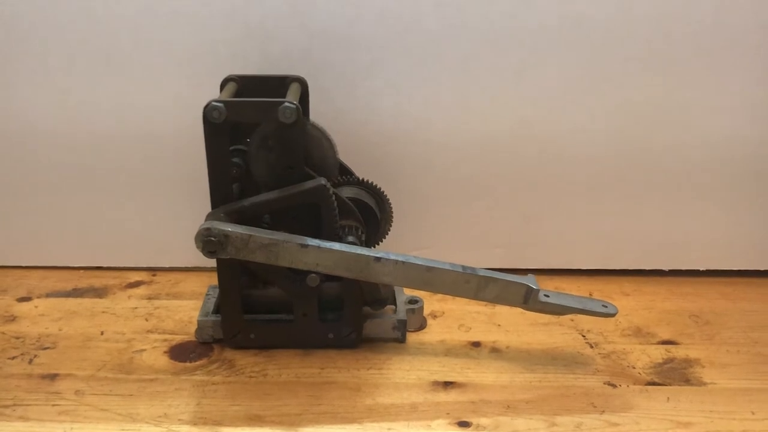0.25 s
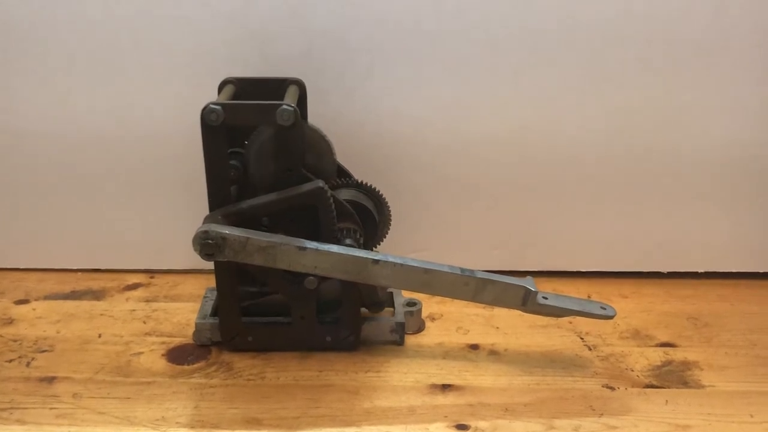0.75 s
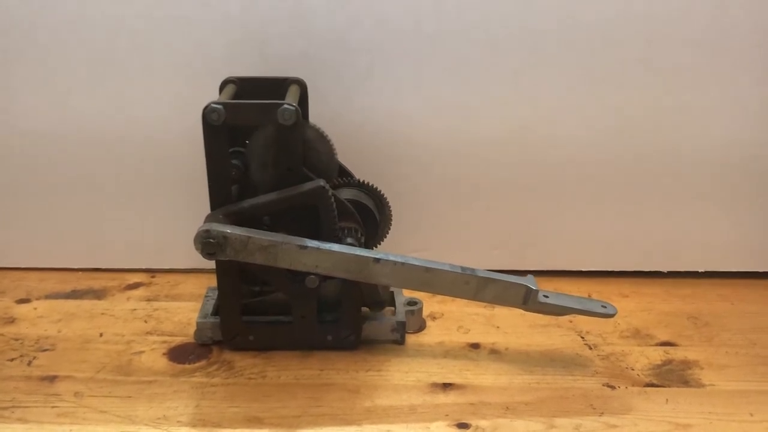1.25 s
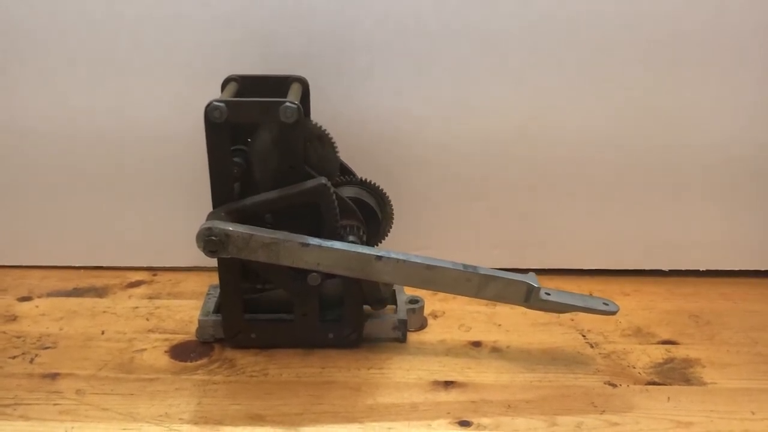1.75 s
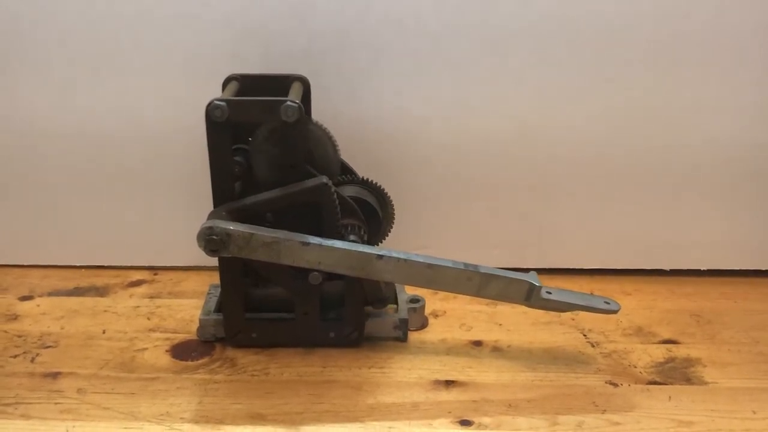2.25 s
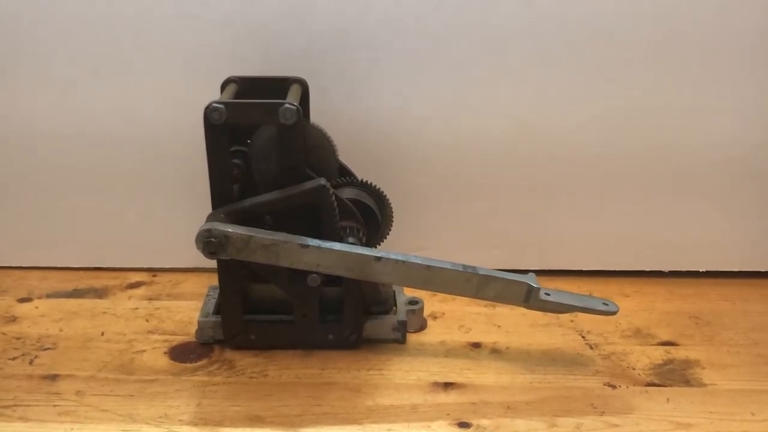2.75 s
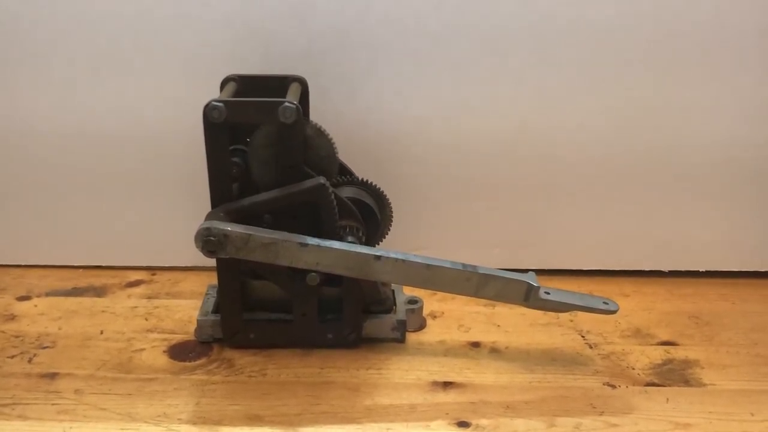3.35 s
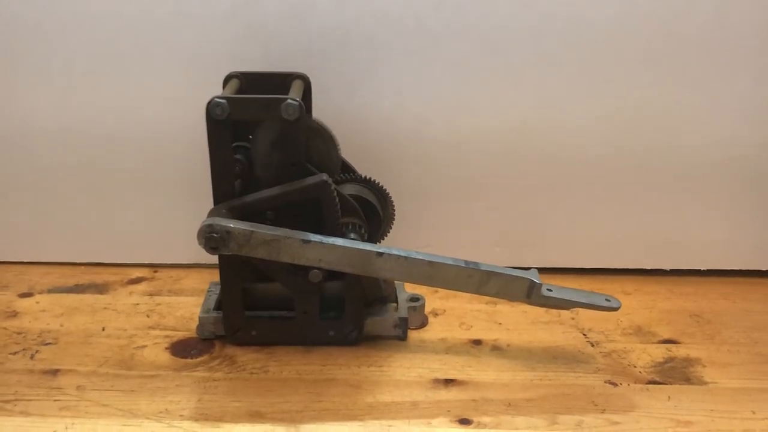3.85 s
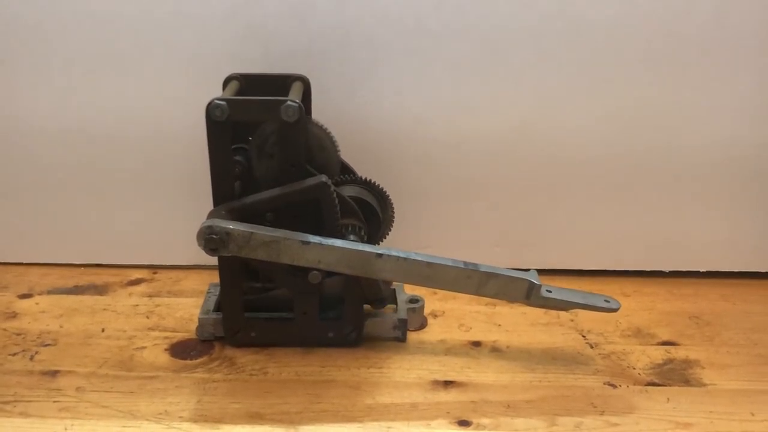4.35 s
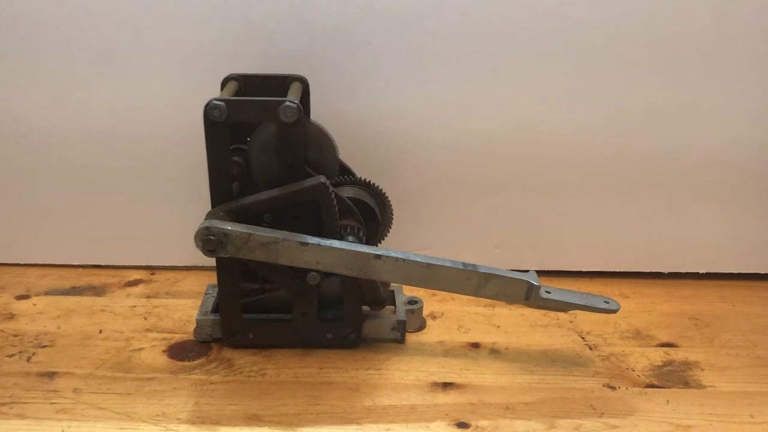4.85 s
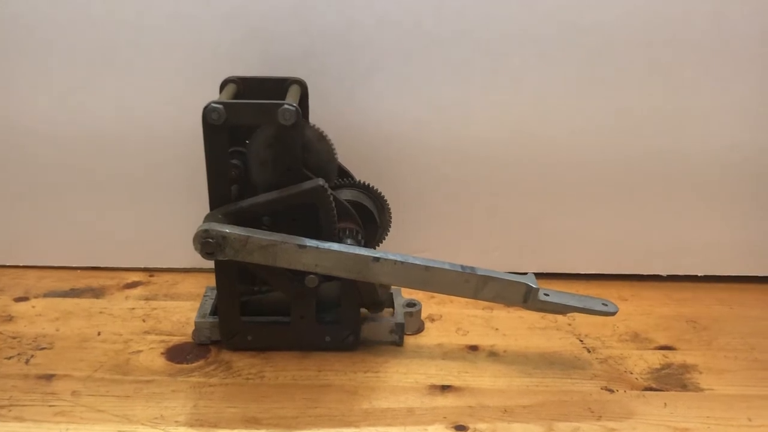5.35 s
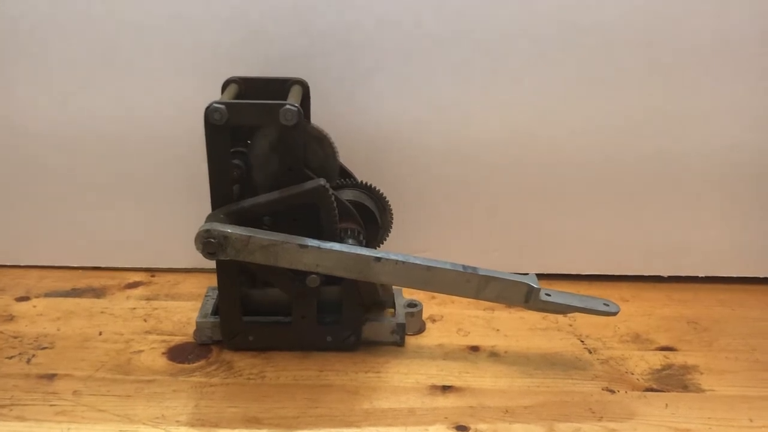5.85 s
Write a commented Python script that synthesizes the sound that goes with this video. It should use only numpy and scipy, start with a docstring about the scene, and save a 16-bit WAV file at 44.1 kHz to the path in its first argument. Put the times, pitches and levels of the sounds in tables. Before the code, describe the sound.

Close-up of an old gear mechanism running evenly on a wooden tabletop indoors. It goes tick-tock a little over four times a second, each beat a tight flurry of dry metallic clicks with a dull rebound, and often a tiny after-click. The table shudders slightly, and the frame knocks on the wood, loudest near the start. Short room echoes, faint high ringing and steady soft hiss surround it.

```python
"""In a quiet room, a small iron clockwork ticks on a wooden table, close to a phone microphone.
Each beat is a cluster of short metal contacts, made of noise bursts that ring the frame and wheels.
Every beat also shakes the table; on most return beats the frame rocks and knocks on the wood.
Two thin high parts ring on faintly, sparse echoes answer, and steady coloured noise lies underneath.
At the start, the thud and rings of a beat just gone are dying away."""
import sys
import numpy as np
from scipy import signal
from scipy.fft import rfft, irfft
from scipy.io import wavfile

SR = 44100
rng = np.random.default_rng(int(sys.argv[2]) if len(sys.argv) > 2 else 0)


def inscribe(sig):
    """Save sig as 16-bit PCM at rate SR to the path in sys.argv[1].

    A 1-D sig is mono; a 2-D sig holds one channel per row.
    Samples are clipped to [-1, 1] before scaling.
    """
    pcm = np.round(np.clip(np.atleast_2d(sig).T, -1, 1) * 32767)
    wavfile.write(sys.argv[1], SR, pcm.astype(np.int16))


N = 268128  # length in samples, about 6 seconds

# In all tables, "fade time" is how long a sound takes to fall by 60 dB.

# Room air and microphone hiss. Each row: pitch in Hz, relative level in dB per Hz.
HUSH_COLOUR = [(15, -39), (25, -3.5), (124, 7.5), (339, 0.5), (399, 2), (524, -6), (1430, -17),
               (1550, -14.5), (2820, -18.5), (3230, -21.5), (4240, -22), (14000, -28.5), (16500, -26)]
HUSH_DB = -62.5  # overall level of the hush

# Two thin high parts left ringing by each beat, the first row by a beat just gone.
# Each row: start in seconds, lower ring in dB, upper ring in dB (both before the swell).
RING_STARTS = [(0, -65, -85), (0.146, -67, -57), (0.371, -76, -67), (0.583, -61, -59), (0.791, -60, -60),
               (1.015, -63, -71), (1.282, -57, -67), (1.498, -63, -63), (1.727, -70, -66),
               (1.998, -70, -82), (2.189, -60, -62), (2.418, -75, -68), (2.643, -75, -69),
               (2.867, -73, -84), (3.074, -72, -74), (3.292, -61, -54), (3.535, -69, -68),
               (3.768, -67, -75), (3.982, -75, -66), (4.196, -74, -69), (4.428, -69, -68),
               (4.647, -59, -74), (4.875, -57, -84), (5.098, -69, -66), (5.33, -73, -62), (5.551, -58, -63),
               (5.778, -70, -73)]
LOWER_HZ, UPPER_HZ = 7981, 13558
LOWER_FADE_S, UPPER_FADE_S = .45, .45
SWELL_S, STILL_S = .02, .23  # a ring builds up, and is stilled about a beat later

# Ringing tones of the table top. Each row: pitch in Hz, relative level in dB, fade time in seconds.
TABLE_TONES = [(299, -1.5, 0.21), (394.3, 9.5, 0.12), (406.3, 0, 0.2), (438, -3, 0.19), (484, -13, 0.2),
               (582, -5, 0.17), (691, -9.5, 0.095), (718, -7.5, 0.052), (802, -23, 0.67), (871, -25, 0.96),
               (902, -34, 0.89)]
# The many close upper tones of the boards, too dense to tell apart.
# Each row: pitch in Hz, relative level in dB, fade time in seconds.
BOARD_TONES = [(253, -1, 0.24), (450, -32, 0.11), (700, 2.5, 0.074), (1050, -10, 0.12), (1530, 1, 0.076),
               (2080, -7, 0.071), (2500, 1.5, 0.044), (3600, -13, 0.044), (4925, -17.5, 0.04)]
# Short thud of the heavy base as it strikes the wood.
# Each row: pitch in Hz, relative level in dB, fade time in seconds.
BASE_TONES = [(699, 5.5, 0.037), (1050, -0.5, 0.038), (1340, -25.5, 0.081), (1914, 6, 0.04),
              (2927, -21, 0.042), (3270, 6, 0.039)]
BOARDS_DB, BASE_DB = -2, -9.5  # compared with the table tones
# Low resonances of the room, slow to build after a push.
# Each row: pitch in Hz, width in Hz, relative level in dB.
ROOM_BOOMS = [(126.1, 10, -1), (217.8, 16.4, -8), (275.7, 14.7, -6), (301.3, 41, -15)]

# The frame rocks and knocks on the wood; the first row is the dying thud of a beat just gone.
# Each row: start in seconds, level in dB, hardness in Hz, room boom in dB against the level.
FRAME_THUDS = [(0.0, -47.5, 930, -3.5), (0.3808, -21, 3600, -30), (1.7545, -29, 1300, -12.5),
               (2.2327, -42, 450, -16), (2.674, -38, 545, -8.5), (3.116, -36.5, 700, -13.5),
               (4.0166, -32.5, 920, -9), (4.4551, -34, 1050, -7.5), (4.8987, -33, 1120, -10.5),
               (5.3709, -36, 570, -10.5), (5.805, -31, 1134, -10)]
# How high a shudder reaches (Hz), and how quickly each push dies down (ms).
SHUDDER_HZ, TICK_SHUDDER_MS, TOCK_SHUDDER_MS, THUD_MS = 1420, 31.4, 24.5, 0.046

# Forward beats: a tooth slips off, lands, rebounds dully and often clicks once more.
# Each row: start in seconds, slip level in dB, slip length in ms, landing delay in ms,
# landing level in dB, landing length in ms, rebound delay in ms, rebound level in dB,
# click delay in ms, click level in dB, shudder level in dB, room boom in dB against the shudder.
# Delays count from the slip.
FORWARD_BEATS = [(0.1305, -31, 5.2, 7.2, -31, 5.1, 25.4, -42.5, 69.2, -34.5, -42, -3.5),
                 (0.567, -30, 4.3, 5.7, -27.5, 3.7, 31.4, -42, 67.3, -52, -42.5, -10),
                 (0.9991, -35.5, 7.9, 9.0, -31, 6.1, 26.6, -40.5, 68.0, -70, -45, -7),
                 (1.4827, -30.5, 5, 8.6, -27.5, 3.3, 30, -38.5, 68.0, -70, -46, -0.5),
                 (1.9834, -38.5, 7.1, 11.4, -24, 2, 30, -41, 68.0, -70, -45, -14.5),
                 (2.402, -30.5, 5.6, 7.4, -26.5, 3.9, 27, -39, 67, -39.5, -41, -8.5),
                 (2.852, -30.5, 5.3, 7.4, -29.5, 2.1, 31.5, -40, 65.5, -38, -41.5, -7.5),
                 (3.2766, -28.5, 6.1, 7.6, -26.5, 2.9, 28.5, -37.5, 70.4, -46, -42, -10),
                 (3.753, -30.5, 5, 8.1, -24.5, 1.35, 29.8, -37.5, 70, -36, -41.5, -9),
                 (4.1807, -31, 4.4, 9.6, -26, 2.5, 30.1, -39.5, 81, -73, -45.5, -2),
                 (4.6325, -30, 5.3, 7.3, -26, 2.9, 27, -42, 65, -35.5, -43, -7.5),
                 (5.0833, -25, 0.92, 5.1, -33, 6.8, 29, -38.5, 68.0, -70, -42.5, -7),
                 (5.5359, -37, 10.7, 10, -26.5, 4.3, 30.8, -39, 70, -35, -43.5, -5),
                 (5.9843, -33, 6.2, 7.2, -25, 3.4, 27.5, -42, 69.1, -35.5, -43.5, -7)]
# Return beats: a softer slip, a bright landing that ends in a snap, then a faint rebound.
# Each row: start in seconds, slip level in dB, slip length in ms, landing delay in ms,
# landing level in dB, landing length in ms, landing brightness in dB, snap delay in ms,
# snap level in dB, rebound level in dB, shudder level in dB, room boom in dB against the shudder.
RETURN_BEATS = [(0.3554, -45.5, 8.4, 14.1, -32.5, 4.3, 3.5, 21, -25, -60, -46, -28),
                (0.7753, -42.5, 13.5, 5.3, -36, 10.2, 14, 10.5, -26.5, -41.5, -43, -16.5),
                (1.2666, -36.5, 5.4, 9.5, -36, 2.3, 10, 11.5, -20.5, -47.5, -40.5, -13),
                (1.7112, -36, 5.4, 10.9, -25.5, 0.81, 11, 13.5, -27.5, -43.5, -42.5, -7),
                (2.1731, -36, 5.9, 10.7, -25.5, 1.3, 14, 14, -50, -64, -42, -20),
                (2.6287, -39, 3.5, 10.5, -27.5, 0.88, 7, 12.7, -24, -66, -42.5, -6),
                (3.0586, -36.5, 7.2, 9.3, -29.5, 1.8, 39, 13, -26, -44, -39.5, -16.5),
                (3.5205, -37, 4.2, 7.4, -31, 6.8, 12, 12, -45, -47, -42, -8.5),
                (3.9661, -27.5, 1.6, 8.3, -26.5, 2.4, 11.5, 11.3, -25, -48.5, -41, -26),
                (4.4132, -33.5, 5.7, 9.7, -28, 1.8, 30, 11.6, -26.5, -46, -41, -10),
                (4.8599, -37.5, 5.4, 10.4, -29.5, 4, 13.5, 16, -30, -48, -43.5, -35),
                (5.3149, -37, 7.5, 11.3, -33.5, 2.3, 9, 15, -25, -47, -40, -24),
                (5.7626, -35.5, 3.9, 9.8, -27, 1.3, 17, 10.8, -25.5, -44, -39.5, -15)]
# Dull taps of the wheel train taking up its play, mostly just ahead of a beat.
# Each row: start in seconds, level in dB.
TRAIN_TAPS = [(0.024, -59.5), (0.085, -63), (0.097, -60), (0.1083, -52), (0.122, -49), (0.174, -52),
              (0.3328, -55.5), (0.5399, -58), (0.586, -43), (0.7095, -55), (0.737, -55), (0.7566, -53),
              (0.7698, -39), (0.8278, -49.5), (0.957, -51), (0.9817, -47), (0.9945, -51), (1.037, -49),
              (1.163, -58), (1.201, -56), (1.22, -57), (1.243, -53.5), (1.265, -43), (1.4516, -59),
              (1.4627, -52), (1.5237, -52), (1.607, -60.5), (1.6673, -57), (1.686, -53.5), (1.694, -49.5),
              (1.753, -50), (1.9587, -57.5), (2.0218, -42), (2.1474, -50.5), (2.1533, -54), (2.1617, -44.5),
              (2.368, -53), (2.3814, -60), (2.6068, -52.5), (2.817, -59), (2.8306, -50), (3.0335, -48),
              (3.052, -37), (3.233, -54), (3.254, -49.5), (3.416, -56.5), (3.459, -58), (3.4756, -59),
              (3.4941, -59), (3.5025, -54), (3.5571, -51), (3.712, -52.5), (3.7306, -49.5), (3.905, -59),
              (3.9225, -60), (3.955, -50), (4.105, -62), (4.134, -60), (4.1457, -61), (4.158, -51),
              (4.39, -50), (4.4035, -55), (4.601, -57.5), (4.6827, -47), (4.797, -55), (4.817, -54),
              (4.836, -55), (4.8523, -46), (4.8941, -42.5), (4.9175, -48), (5.042, -50.5), (5.0536, -61),
              (5.063, -48), (5.212, -52), (5.2538, -60), (5.269, -54.5), (5.2907, -52.5), (5.5066, -57.5),
              (5.5205, -53), (5.7196, -60), (5.738, -48.5), (5.746, -52), (5.805, -52), (5.9607, -49.5),
              (6.027, -52)]

# Brightness of each kind of contact: treble over body in dB, before the body's fixed lift.
TICK_SLIP_DB, TICK_LANDING_DB, TICK_REBOUND_DB, CLICK_DB = 6, 6.5, -37, 8.5
TOCK_SLIP_DB, SNAP_DB, TOCK_REBOUND_DB, TAP_DB = 4.5, 26.5, 0, -20
BODY_LIFT_DB = 4.0
# Lengths of the contacts in ms, and how long a return rebound waits after its slip.
TICK_REBOUND_MS, CLICK_MS, SNAP_MS, TOCK_REBOUND_MS, TAP_MS = 1.85, 0.31, 0.3, 3.3, 2
TOCK_REBOUND_DELAY_MS = 27

# Low resonances of the iron frame. Each row: pitch in Hz, width in Hz, relative level in dB.
FRAME_PEAKS = [(1630, 88, -0.5), (1900, 170, -10.5), (2565, 110, -6.5), (3114, 91, 1.5), (3268, 200, 10),
               (3800, 290, 5.5), (4184, 300, -11), (4380, 25, -7), (4824, 200, 3)]
# High resonances of wheels and pallets. Each row: pitch in Hz, width in Hz, relative level in dB.
WHEEL_PEAKS = [(6040, 510, 23.5), (8500, 240, 21.5), (8950, 150, -16), (7800, 1100, 3), (10940, 1600, 19.5),
               (10370, 990, 19), (12100, 530, 19), (12940, 700, 25), (15400, 600, -5)]
# A thin part that sings on after every contact.
# Each row: pitch in Hz, level in dB against the contact, fade time in seconds.
SINGING_PART = [(3280, -63, .25)]

# How quickly the room's echoes die. Each row: pitch in Hz, fade time in seconds.
ROOM_FADES = [(200, 0.39), (530, 0.23), (1400, 0.35), (3700, 0.26), (6500, 0.24), (9700, 0.17),
              (15000, 0.13)]

EDGE_HZ = 16050  # upper limit of the recorder


def gain_of(db):
    """Turns decibels into an amplitude."""
    return 10 ** (np.asarray(db) / 20)


def unit(x):
    """Scales a sound so that its squares add up to 1."""
    return x / np.sqrt(np.sum(x ** 2) + 1e-20)


def read(points, hz):
    """Reads between the rows of a (pitch, value) table, on a logarithmic pitch axis."""
    table_hz, value = np.transpose(points)
    return np.interp(np.log(hz + 1), np.log(table_hz + 1), value)


def add(mix, start_s, sound):
    """Mixes a sound in from a given time, cutting it off at the end of the mix."""
    part = mix[round(start_s * SR):][:len(sound)]
    part += sound[:len(part)]


def ringing(modes, size):
    """One tap makes an object ring: each of its tones is a sine wave that dies away."""
    t = np.arange(size) / SR
    return sum(gain_of(db - 60 * t / fade_s) * np.sin(2 * np.pi * hz * t) for hz, db, fade_s in modes)


def hush():
    """Room air and hiss: steady random noise, coloured by setting the level of each pitch."""
    hz = np.fft.rfftfreq(N, 1 / SR)
    spectrum = rfft(rng.standard_normal(N)) * gain_of(read(HUSH_COLOUR, hz))
    return gain_of(HUSH_DB) * np.sqrt(N) * unit(irfft(spectrum, N))


def rings():
    """Each beat sets two thin parts ringing, with a strength of its own; they build up and are stilled."""
    out = np.zeros(N)
    t = np.arange(round(STILL_S * SR)) / SR
    shape = (1 - np.exp(-t / SWELL_S)) * np.sqrt(1 - t / STILL_S)
    for start_s, lower_db, upper_db in RING_STARTS:
        tones = [(LOWER_HZ, lower_db, LOWER_FADE_S), (UPPER_HZ, upper_db, UPPER_FADE_S)]
        add(out, start_s, shape * ringing(tones, len(t)))
    return out


def boards(size, count=400):
    """A tap rings many board tones at random pitches, each starting one way or the other by chance."""
    table_hz, db, fade_s = np.transpose(BOARD_TONES)
    steps = (np.arange(count) + rng.random(count)) / count  # one tone in every small step of pitch
    hz = table_hz[0] + (table_hz[-1] - table_hz[0]) * steps
    modes = np.c_[hz, read(np.c_[table_hz, db], hz), read(np.c_[table_hz, fade_s], hz)]
    up = rng.random(count) < .5
    return unit(ringing(modes[up], size) - ringing(modes[~up], size))


def pushes():
    """Lists beat shudders and thuds: start in s, level in dB, hardness in Hz, length in ms, boom in dB."""
    rows = [(s, db, SHUDDER_HZ, TICK_SHUDDER_MS, boom_db) for s, *_, db, boom_db in FORWARD_BEATS]
    rows += [(s, db, SHUDDER_HZ, TOCK_SHUDDER_MS, boom_db) for s, *_, db, boom_db in RETURN_BEATS]
    rows += [(s, db, hard_hz, THUD_MS, boom_db) for s, db, hard_hz, boom_db in FRAME_THUDS]
    return rows


def table():
    """Each push, a short thud or a longer shudder, rings the wood; a softer one loses the high tones."""
    t = np.arange(SR // 3) / SR
    wood = unit(ringing(TABLE_TONES, len(t))) + gain_of(BOARDS_DB) * boards(len(t))
    base = gain_of(BASE_DB) * unit(ringing(BASE_TONES, len(t)))
    boom = np.zeros(len(t))
    for hz, width_hz, db in ROOM_BOOMS:
        slow_swell = t * np.exp(-np.pi * width_hz * t)
        boom += gain_of(db) * unit(slow_swell * np.sin(2 * np.pi * hz * t))

    out = np.zeros(N)
    for start_s, db, hard_hz, length_ms, boom_db in pushes():
        shake = rng.standard_normal(3000)
        clean = np.exp(-length_ms)  # a short thud is one clean push, a long shudder is ragged
        force = (clean + (1 - clean) * shake) * np.exp(-t[:3000] * 1000 / length_ms)
        softener = signal.butter(2, [230, hard_hz], "band", fs=SR, output="sos")
        force = signal.sosfilt(softener, force)
        struck = unit(signal.fftconvolve(force, wood + clean * base)[:len(t)])
        level = gain_of(db) * np.sqrt(.016 * SR)  # the energy of 16 ms at this level
        add(out, start_s, level * (struck + gain_of(boom_db) * boom))
    return out


def contacts():
    """Spells the beats out as contacts: start in s, level in dB, brightness in dB, length in ms."""
    rows = [(s, db, TAP_DB, TAP_MS) for s, db in TRAIN_TAPS]
    for s, slip_db, slip_ms, land, land_db, land_ms, back, back_db, click, click_db, *_ in FORWARD_BEATS:
        rows += [(s, slip_db, TICK_SLIP_DB, slip_ms),
                 (s + land / 1e3, land_db, TICK_LANDING_DB, land_ms),
                 (s + back / 1e3, back_db, TICK_REBOUND_DB, TICK_REBOUND_MS),
                 (s + click / 1e3, click_db, CLICK_DB, CLICK_MS)]
    for s, slip_db, slip_ms, land, land_db, land_ms, bright_db, snap, snap_db, back_db, *_ in RETURN_BEATS:
        rows += [(s, slip_db, TOCK_SLIP_DB, slip_ms),
                 (s + land / 1e3, land_db, bright_db, land_ms),
                 (s + snap / 1e3, snap_db, SNAP_DB, SNAP_MS),
                 (s + TOCK_REBOUND_DELAY_MS / 1e3, back_db, TOCK_REBOUND_DB, TOCK_REBOUND_MS)]
    return rows


def metal(peaks, lo_hz, hi_hz, tick_db, spot_db):
    """A tap on metal: short resonances, reweighed by the spot struck, over a bare wide-band tick."""
    t = np.arange(2048) / SR
    resonances = np.zeros(len(t))
    for k, (hz, width_hz, db) in enumerate(peaks):
        strength = gain_of(db + spot_db * rng.standard_normal()) * np.sqrt(width_hz)
        fade = np.exp(-np.pi * width_hz * t)  # a wider resonance dies sooner
        resonances += (-1) ** k * strength * fade * np.sin(2 * np.pi * hz * t)
    band = signal.butter(4, [lo_hz, hi_hz], "band", fs=SR, output="sos")
    tick = signal.sosfilt(band, t == 0)
    return unit(unit(resonances) + gain_of(tick_db) * unit(tick))


def clockwork():
    """Each contact is a brief chatter of tiny impacts, shared between body and wheels by its brightness."""
    lead = 700  # samples of sliding before a contact
    t_ms = (np.arange(1600) - lead) / SR * 1000
    hits = contacts()
    chatter = rng.standard_normal((len(hits), 2, 1600))
    # body and wheels share the same random unevenness from instant to instant
    chatter *= gain_of(3.7 * rng.standard_normal((len(hits), 1, 1600)))
    bodies = [metal(FRAME_PEAKS, 900, 7300, -8.5, 2.4) for _ in range(8)]
    wheels = [metal(WHEEL_PEAKS, 5500, 14800, 4, 1.5) for _ in range(8)]
    slide = (t_ms < 0) * np.exp(t_ms / 6.9)  # the teeth rub faintly just before they meet

    out, drive = np.zeros(N), np.zeros(N)
    for k, (contact_s, db, bright_db, length_ms) in enumerate(hits):
        dull, sharp = chatter[k]
        swell = np.maximum(1 - np.exp(-t_ms / (0.15 * length_ms)), 0)
        shape = swell / (1 + np.exp((t_ms - length_ms) / 1.85))  # swells, rattles, stops
        body_level = gain_of(db) * np.sqrt(np.sum(shape ** 2) / (1 + gain_of(2 * bright_db)))
        wheel_level = body_level * gain_of(bright_db)
        low = dull * (shape + gain_of(-16) * slide)
        high = sharp * (shape + gain_of(-32) * slide)
        body_sound = unit(signal.fftconvolve(low, bodies[k % 8]))
        wheel_sound = unit(signal.fftconvolve(high, wheels[k % 8]))
        start_s = contact_s - lead / SR
        add(out, start_s, body_level * gain_of(BODY_LIFT_DB) * body_sound)
        add(out, start_s, wheel_level * wheel_sound)
        add(drive, start_s, wheel_level * unit(sharp * shape))

    # The teeth creep on: about 130 tiny random impacts a second ring the frame.
    moments = rng.random(N) < 130 / SR
    creep_db = -62.0 + 5.0 * np.minimum(rng.exponential(1, N), 4)
    creep = moments * gain_of(creep_db) * rng.choice([-1., 1.], N)
    out += signal.fftconvolve(creep, bodies[0])[:N]
    singing = signal.fftconvolve(drive, ringing(SINGING_PART, SR // 2))[:N]
    return out + singing


def room(x, count=3):
    """Sparse echoes of random sign, each band dying at its own speed; the pattern slowly shifts."""
    out = np.zeros(N)
    turn = np.pi * np.arange(N) / SR / .7
    for k in range(count):
        echoes = np.zeros(SR // 2)
        at = np.arange(80, len(echoes) - 12, 12)
        spots = at + rng.integers(0, 12, len(at))
        signs = rng.choice([-1., 1.], len(at))
        echoes[spots] = signs
        hz, t, bands = signal.stft(echoes, SR, nperseg=256)
        fade = gain_of(-60 * t / read(ROOM_FADES, hz)[:, None])
        tail = signal.istft(bands * fade, SR, nperseg=256)[1]
        share = np.sqrt(2 / count) * np.cos(turn + np.pi * k / count)  # squared shares add up to 1
        out += signal.fftconvolve(x * share, unit(tail))[:N]
    return out


def scene():
    """Adds up the clockwork, the thin rings, the table, the echoes and the quiet of the room."""
    ticks, wood = clockwork(), table()
    echoes = room(gain_of(-11.0) * ticks + gain_of(-9.0) * wood)
    return (ticks + rings() + wood + echoes + hush())[None]


def record(dry):
    """The small microphone loses the deepest bass; the recorder then cuts the highest treble."""
    bass_cut = signal.butter(2, 45, "high", fs=SR, output="sos")
    thin = signal.sosfilt(bass_cut, dry)
    treble_cut = signal.firwin(255, EDGE_HZ, window=("kaiser", 9), fs=SR)
    return signal.oaconvolve(thin, treble_cut[None], "same")


dry = scene()
out = record(dry)
inscribe(out)
```